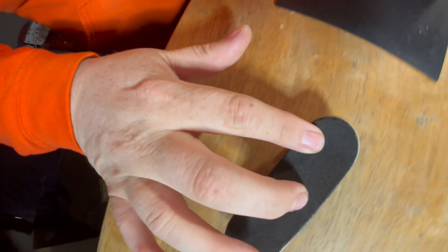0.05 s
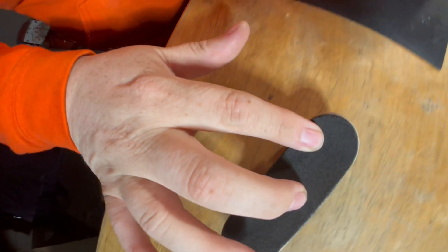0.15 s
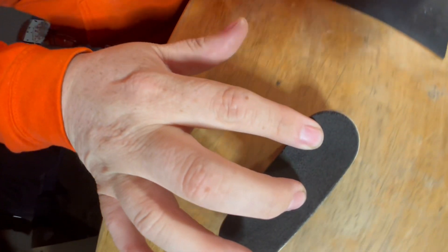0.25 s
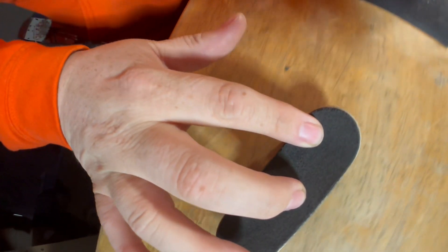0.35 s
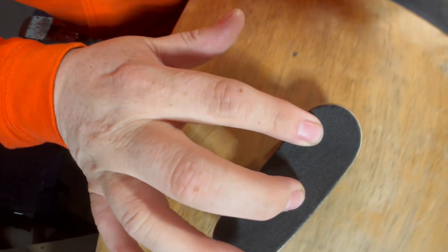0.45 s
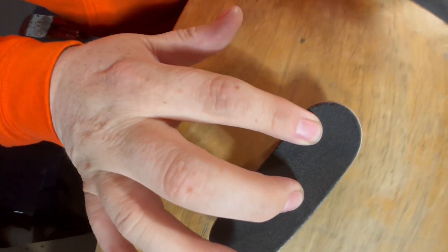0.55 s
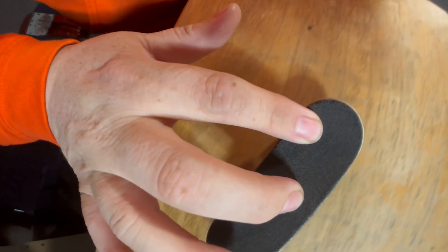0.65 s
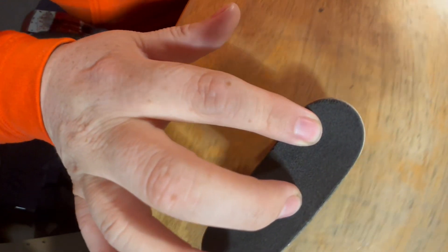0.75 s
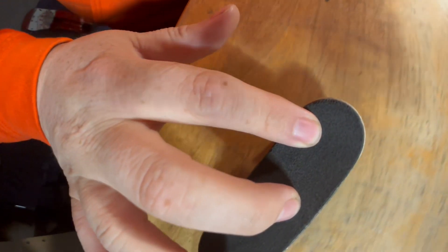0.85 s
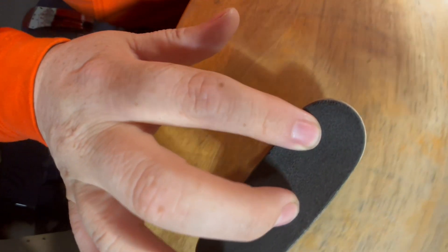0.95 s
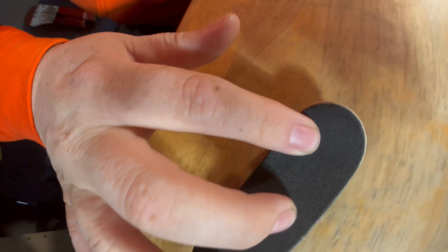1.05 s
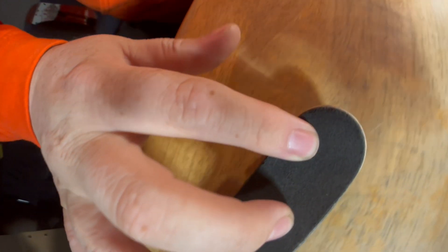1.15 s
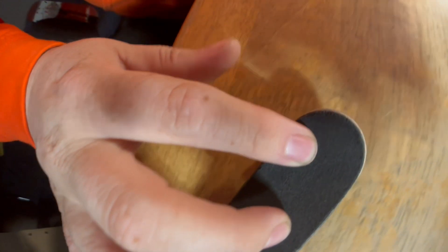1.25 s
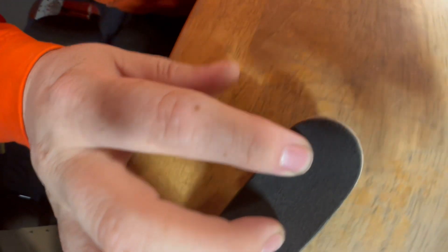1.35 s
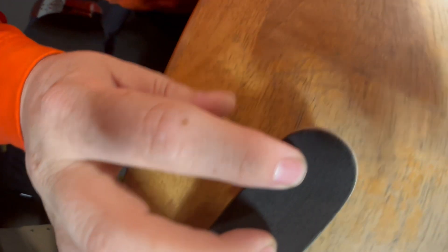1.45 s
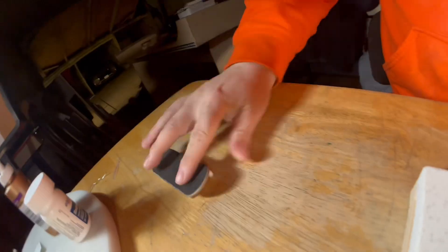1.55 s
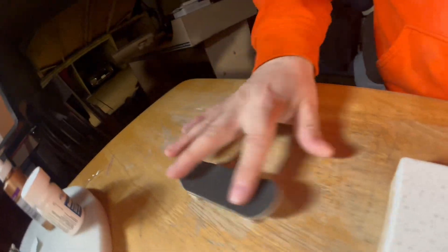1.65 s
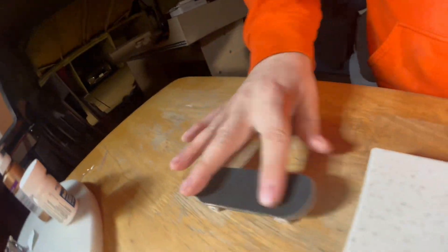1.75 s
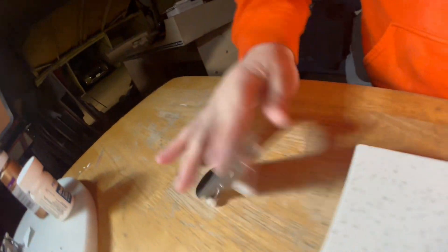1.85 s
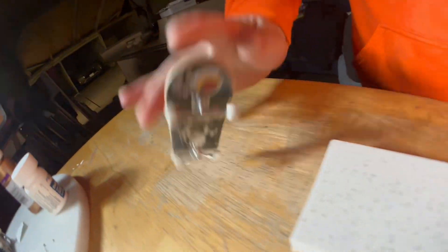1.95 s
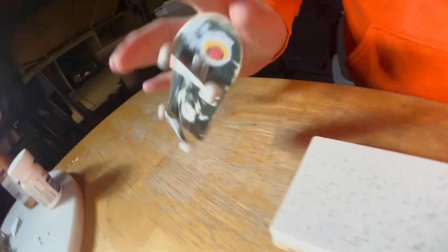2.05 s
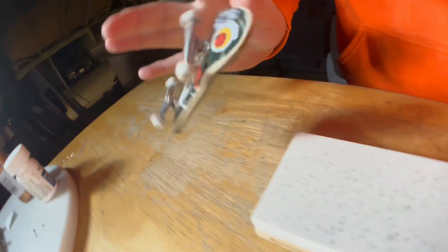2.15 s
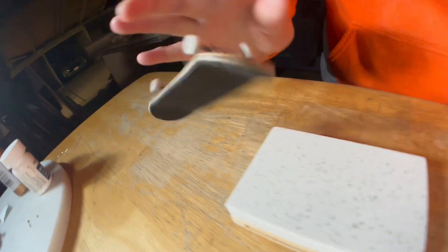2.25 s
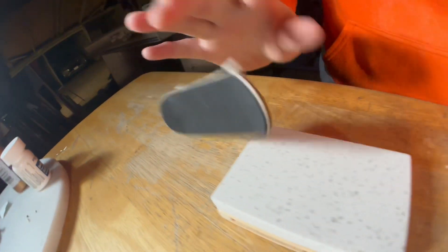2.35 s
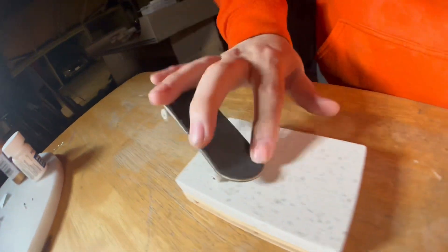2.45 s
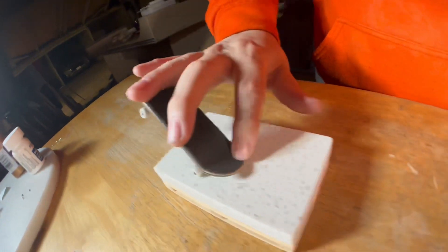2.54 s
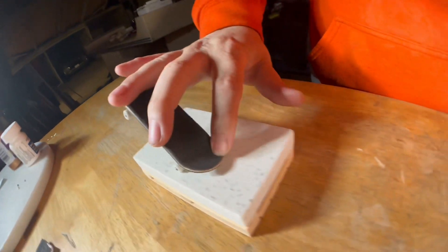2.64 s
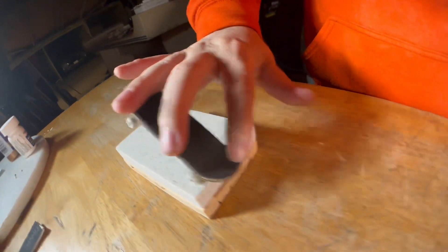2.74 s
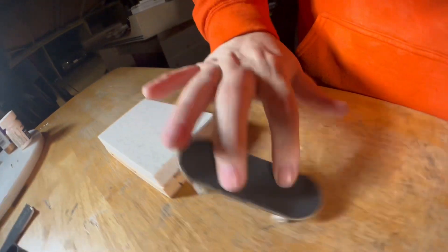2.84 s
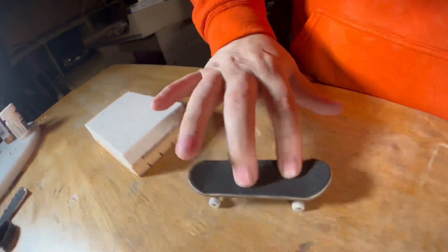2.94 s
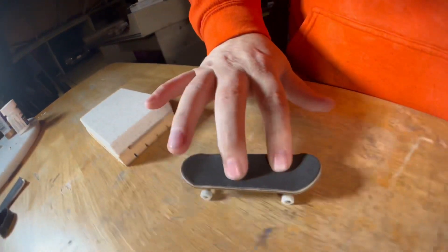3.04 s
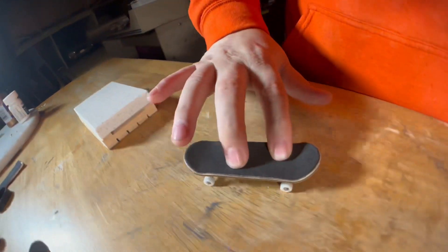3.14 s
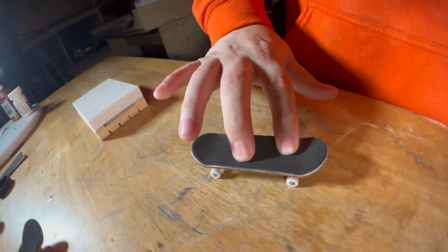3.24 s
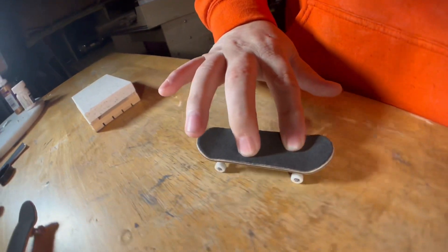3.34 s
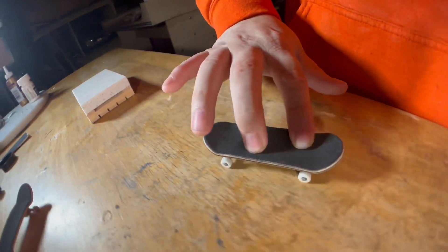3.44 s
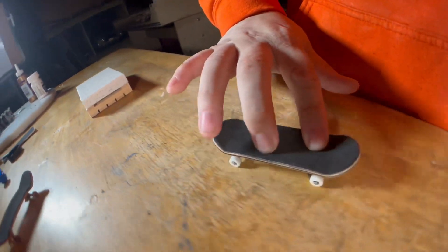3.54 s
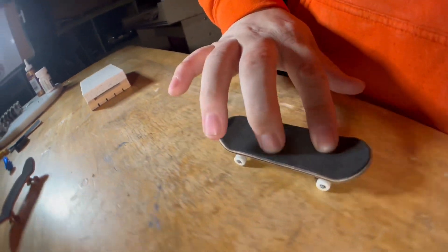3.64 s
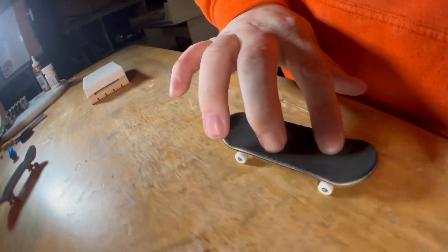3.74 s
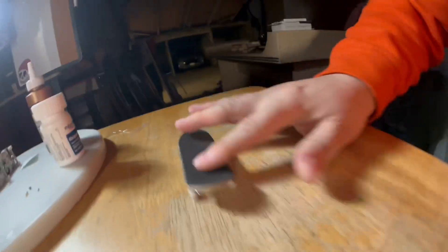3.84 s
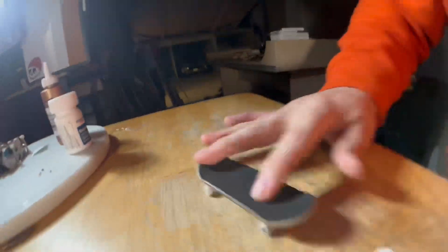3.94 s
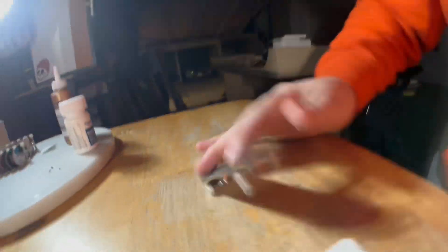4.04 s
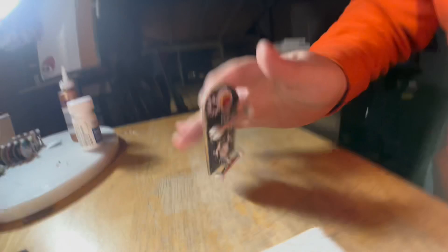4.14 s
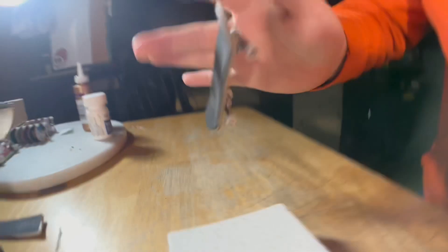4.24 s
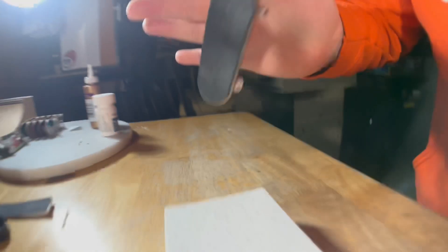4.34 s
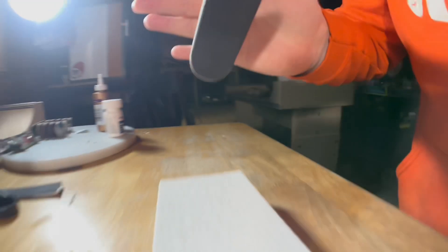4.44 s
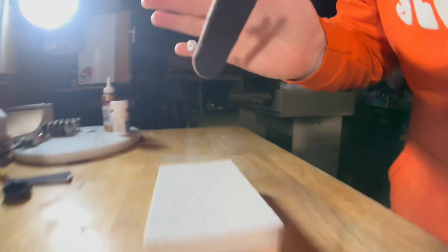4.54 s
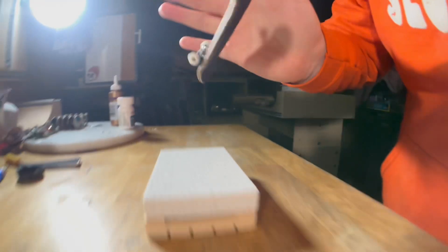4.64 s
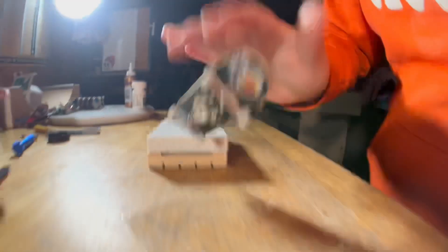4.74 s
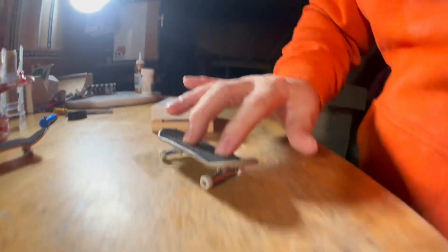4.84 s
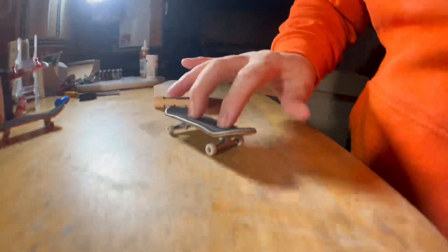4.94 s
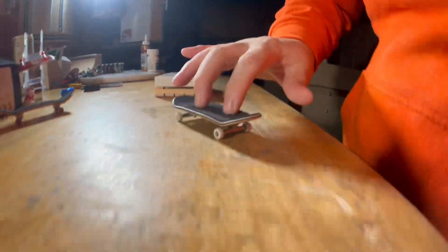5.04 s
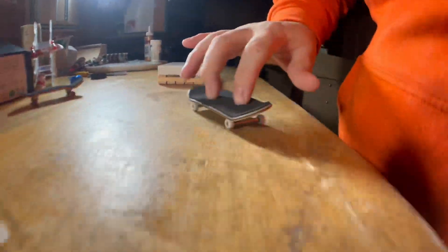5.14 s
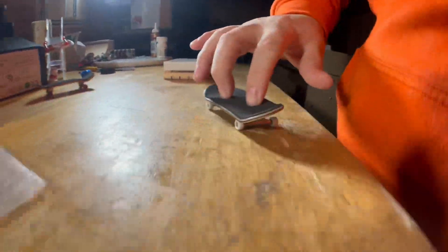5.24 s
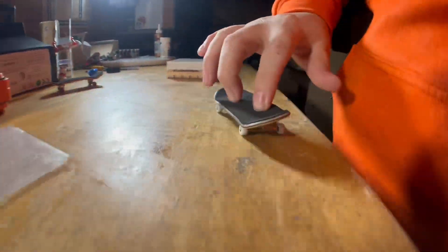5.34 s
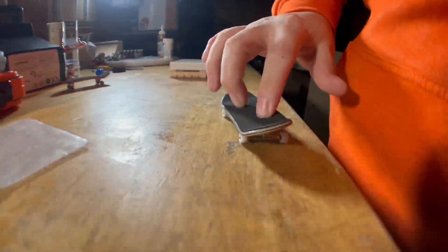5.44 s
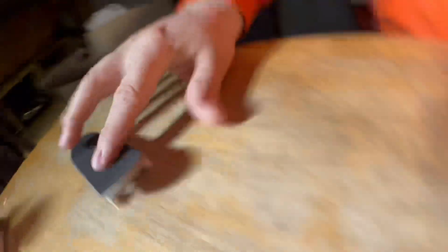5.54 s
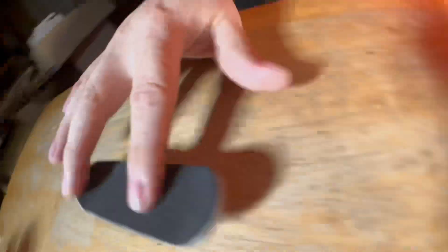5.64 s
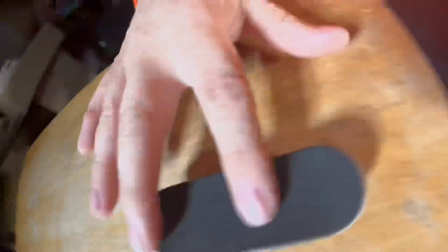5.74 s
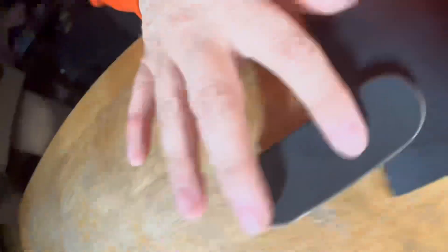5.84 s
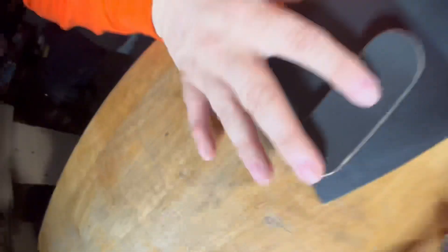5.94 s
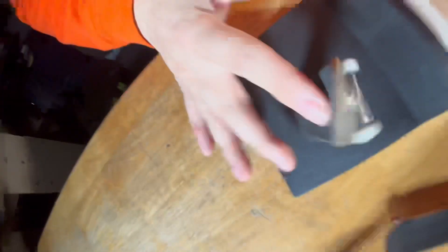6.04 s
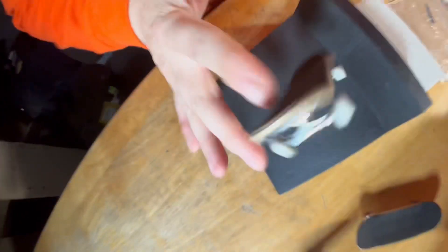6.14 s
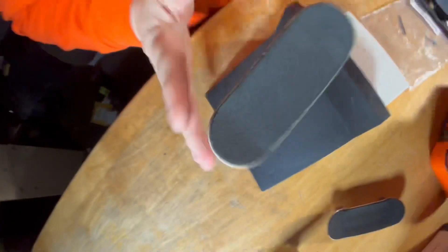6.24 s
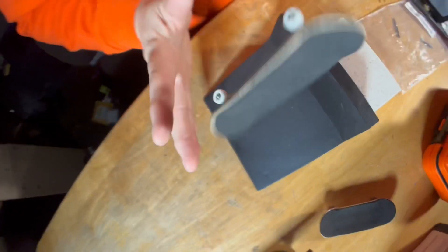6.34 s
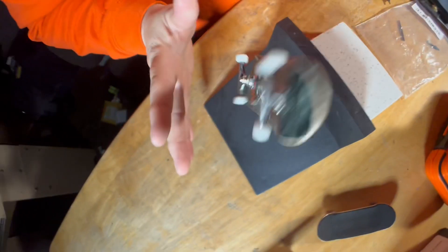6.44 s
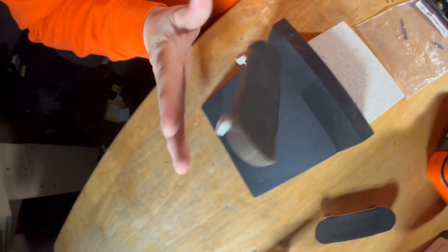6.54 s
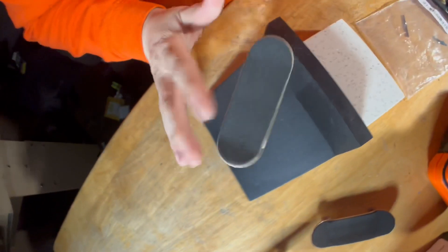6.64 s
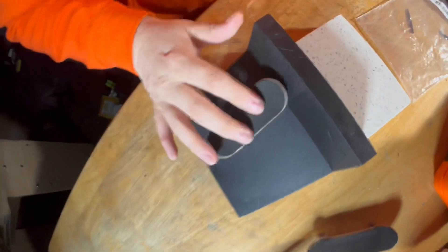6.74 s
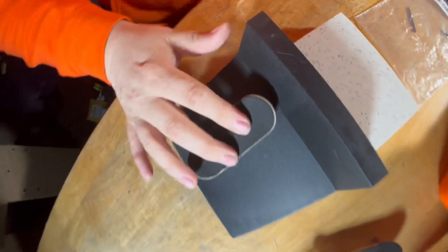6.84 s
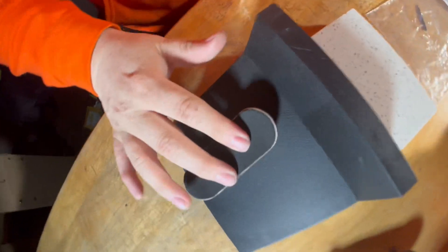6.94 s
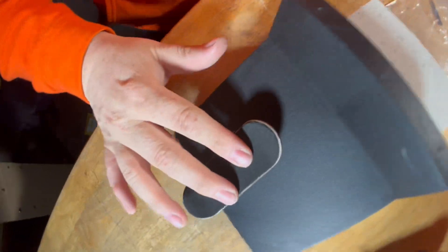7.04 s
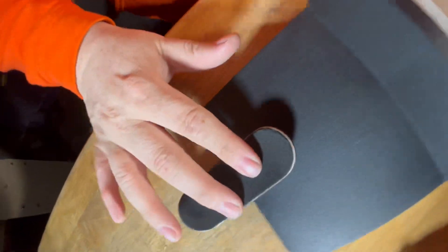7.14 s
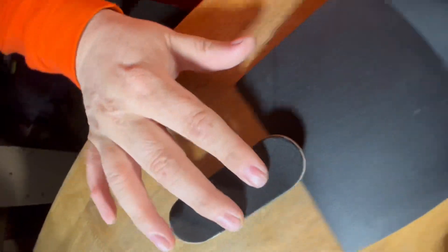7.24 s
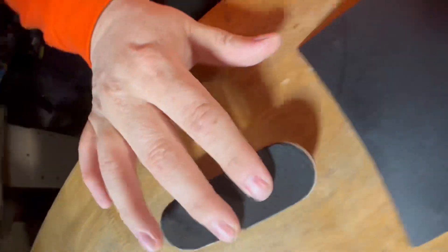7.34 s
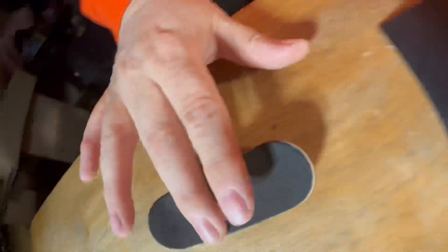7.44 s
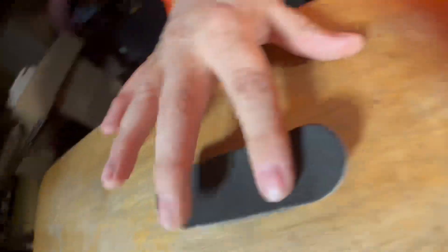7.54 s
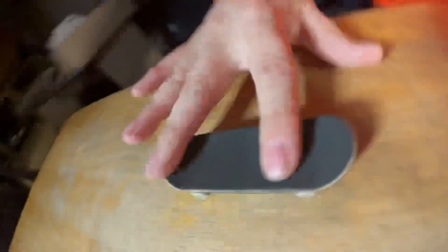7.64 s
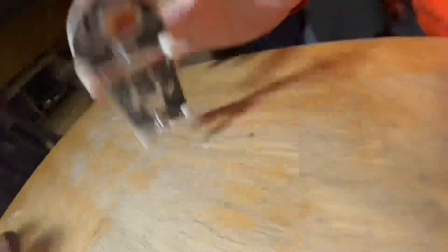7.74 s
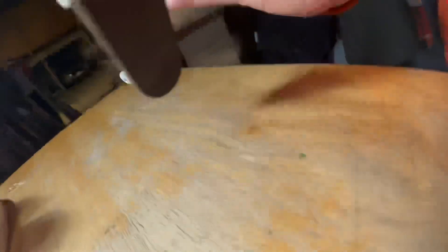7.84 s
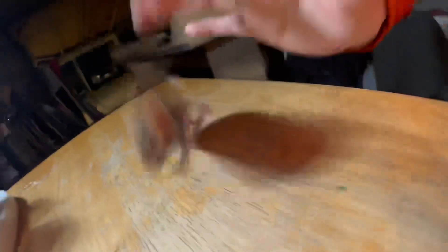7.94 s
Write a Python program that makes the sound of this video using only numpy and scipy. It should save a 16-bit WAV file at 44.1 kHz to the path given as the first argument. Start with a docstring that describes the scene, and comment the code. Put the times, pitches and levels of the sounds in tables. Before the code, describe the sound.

A finger-sized skateboard rolls, pops and clacks down on a wooden table, some tricks slowed and lowered, then rattles over a hollow ramp.

```python
"""In a small room, a finger-sized skateboard rolls, scrapes, pops and lands on a wooden table, a stone block
and a hollow ramp. Rough noise shakes the wood, wheels and grit; short blows ring them, the table top and the ramp.
Pressed wheels growl, and a slow axle sings. Echoes, faint hiss and a low rumble surround the board.
A close phone with two microphone ports hears it; the run-up and the flips play in slow motion,
which stretches the sound and lowers its pitch."""
import sys
import numpy as np
from scipy import signal
from scipy.fft import rfft, irfft, next_fast_len
from scipy.io import wavfile
from scipy.ndimage import map_coordinates

SR = 44100
rng = np.random.default_rng(int(sys.argv[2]) if len(sys.argv) > 2 else 0)


def output_pcm(signal):
    """Save a mono or channel-first signal as 16-bit PCM at the path in sys.argv[1].

    Samples are clipped to [-1, 1] before scaling.
    """
    pcm = np.clip(np.atleast_2d(signal).T, -1, 1) * 32767
    wavfile.write(sys.argv[1], SR, np.round(pcm).astype(np.int16))


N = 351918
STEP = 16  # samples between control values
TOUCH_S = 0.015  # time the wheels take to meet or leave the surface

# In every table t/s is the time as played; f/Hz is the pitch at real speed, before any slow motion.
# Levels are those of the sources, before the room's echoes and the overall tone colour.

# Slow-motion stretches: start t/s, end t/s, share of real speed
SLOW_MOTION = [(0, 1.5, .357), (1.768, 2.389, .4), (3.997, 4.721, .4), (5.985, 6.711, .4)]


def slow_motion_clock():
    """Adds up the real time that passes while the slowed sound plays, and finds the way back."""
    shown = np.arange(N) / SR
    speed = np.ones(N)
    for start, end, share in SLOW_MOTION:
        speed -= (1 - share) * (shown >= start) * (shown < end)
    lived = np.cumsum(speed) / SR
    return shown, lived, np.interp(shown, lived, shown)


# played time; real time gone by at each played sample; played time of each real-time sample
SHOWN, LIVED, WHEN = slow_motion_clock()


def real_sample(t):
    """The real-time sample that belongs to a played time in seconds."""
    return round(np.interp(t, SHOWN, LIVED) * SR)


# Wheels pushed along, each stroke swelling or fading towards its turning point, then letting go
# (a negative rise is a fall): start t/s, turning point t/s, end t/s,
# rumble level/dB at the turn, its rise/dB, wheel hiss level/dB at the turn, its rise/dB,
# grit over hiss level/dB, rumble f/Hz at start, rumble f/Hz at the turn
PUSH_STROKES = [(0, 1.49, 1.62, -48, -2, -48, 6.5, -21, 984, 1040),
                (1.513, 1.561, 1.66, -41.5, 2.5, -53, -11.5, -2, 380.2, 479.9),
                (1.583, 1.696, 1.769, -27.5, 13, -32, 17, -10.5, 329, 1206),
                (1.784, 1.824, 2.04, -45, 11.5, -59, 0.5, 6, 1103, 1160),
                (2.667, 2.759, 2.768, -43, 28, -36, 24, -11, 905, 1904),
                (2.876, 3.098, 3.59, -43.5, 2, -54.5, 2.5, -13, 1101, 1002),
                (3.197, 3.811, 3.83, -49, 0.5, -49, 7, -21, 1246, 1750),
                (3.846, 3.939, 3.939, -19, 6.5, -18, 14, -3.5, 649.7, 1609),
                (3.95, 3.961, 3.968, -26.5, 1.5, -28, 3, -7, 1296, 1194),
                (4.004, 4.019, 4.206, -36, 1, -39, 5.5, -12, 1333, 1518),
                (4.927, 5.439, 5.475, -44, 5, -54, 12, 3, 758, 1868),
                (5.488, 5.551, 5.59, -33.5, 3.5, -45.5, 15, -5.5, 518.7, 589.8),
                (5.559, 5.794, 5.95, -29, 5, -29.5, 14, -13.5, 650, 949.9),
                (5.853, 5.884, 5.9, -21.5, -2, -32, -6, -6, 1151, 1351),
                (5.894, 5.938, 5.957, -23, -5, -38.5, -7.5, -6, 651.1, 1300),
                (5.977, 5.976, 5.99, -19.5, 6.5, -26, 14.5, -6, 1289, 1482),
                (5.987, 5.987, 6.05, -29, 3, -33, -4, -0.5, 876, 906.4),
                (6.72, 6.748, 6.768, -25, 0, -28.5, 4, -1.5, 698, 990),
                (6.896, 7.068, 7.08, -31, 13, -46.5, 14.5, -4, 555, 500),
                (7.099, 7.177, 7.215, -28, 0.5, -40.5, 14.5, -5.5, 481.8, 1674),
                (7.201, 7.223, 7.27, -27, 1.5, -38, 4, -9, 1044, 561.2),
                (7.3, 7.381, 7.46, -37, 10.5, -44, 17, -13, 845.5, 1023),
                (7.414, 7.491, 7.54, -37.5, 9.5, -44, 9.5, -11, 787, 855),
                (7.552, 7.58, 7.77, -50.5, -2, -65, -1.5, -2, 787, 848),
                (7.619, 7.674, 7.72, -26.5, 19, -29.5, 22.5, -10, 860.5, 1097)]
RUMBLE_FALL_DB, HISS_FALL_DB = 18.5, 26.5  # from turning point to end


def push_strokes(when):
    """Each push moves the levels of rumble, hiss and grit, and the pitch of the rumble."""
    levels, pitch = np.zeros((3, len(when))), np.zeros(len(when))
    for start, turn, end, rumble_db, rise_db, hiss_db, hiss_rise_db, grit_db, start_hz, turn_hz in PUSH_STROKES:
        start, turn, end = np.sort([start, turn, end])
        touch = touching(when, start, end)
        before = np.interp(when, [start, turn, end], [1, 0, 0])
        after = np.interp(when, [start, turn, end], [0, 0, 1])
        rumble = touch * amp(rumble_db - rise_db * before - RUMBLE_FALL_DB * after)
        hiss = touch * amp(hiss_db - hiss_rise_db * before - HISS_FALL_DB * after)
        levels += [rumble, hiss, amp(grit_db) * hiss]
        pitch += rumble * (turn_hz + (start_hz - turn_hz) * before)
    # where strokes overlap, the louder one counts more in the pitch
    return levels, (pitch + 1e-9) / (levels[0] + 1e-12)


# Resonances of deck and table: f/Hz, width f/Hz, level/dB
WOOD_MODES = [(383, 299, 1.5), (575, 240, 0), (835, 141, -1), (1024.5, 156, 0), (1216, 150, -0.5),
              (1608, 180, -1.5), (2019, 190, -2.5), (2483, 448, -2.5)]
# Resonances of wheels and axles: f/Hz, width f/Hz, level/dB
WHEEL_MODES = [(3150, 840, -1.5), (4044, 1170, 0.5), (4775, 814, -2)]
# Resonances of hard small contacts: f/Hz, width f/Hz, level/dB
GRIT_MODES = [(5640, 3230, -7), (8210, 1400, -1.5), (13160, 4800, -13)]
# The singing of a slow axle: f/Hz, width f/Hz, level/dB
AXLE_MODES = [(3767, 32, 0)]
# How loud the axle sings: t/s, level/dB
AXLE_LEVELS = [(0, -53), (.42, -56), (.62, -57.5), (1.45, -56), (1.5, -100)]
CRUSH_DB = -36.5  # the further wheel hiss rises above this, the rarer the specks of grit


def rolling():
    """The surface shakes wood, wheels and grit; finger pressure moves which wood resonance speaks."""
    levels, pitch = push_strokes(WHEN[::STEP])

    # wood resonances far from the current pitch speak more softly, by at most 5.5 dB
    shares = np.array([amp(np.maximum(-16 * np.log2(hz / pitch) ** 2, -5.5)) for hz, w, db in WOOD_MODES])
    shares /= np.linalg.norm(shares, axis=0)
    rub = roughness(lumpy_db=2.0, lump_rate=70, tick_rate=130, tick_db=14.5, spread_db=-1)
    voices = []
    for hz, width, db in WOOD_MODES:
        response = ringing([(hz, width, 0)])
        voice = unit(filtered(rub, lambda f: response(f) ** 2))
        voices.append(amp(db + 1.7 * wobble(32)) * voice)
    wood = np.sum(every_sample(shares) * voices, axis=0)

    crush = np.minimum(amp(CRUSH_DB) / (levels[1] + 1e-9), 1)
    speck_rate = 200 * every_sample([crush])[0]
    scrape = roughness(lumpy_db=2.5, lump_rate=140, tick_rate=speck_rate, tick_db=12, spread_db=2.5)
    wheels = amp(1.4 * wobble(25)) * unit(filtered(scrape, lambda f: ringing(WHEEL_MODES)(f) ** 1.5))
    grit = unit(filtered(scrape, ringing(GRIT_MODES)))

    axle_level = amp(np.interp(WHEN, *np.transpose(AXLE_LEVELS)))
    axle = axle_level * unit(filtered(rub, ringing(AXLE_MODES)))
    return np.sum(every_sample(levels) * [wood, wheels, grit], axis=0) + axle


# Strikes of the board: t/s, level/dB, kind of contact
STRIKES = [(.722, -31.5, "bump"), (.755, -32.5, "bump"), (0.986, -33, "bump"), (1.041, -41, "bump"),
           (1.15, -40, "bump"), (1.294, -27.5, "bump"), (1.337, -24.5, "bump"), (1.502, -18.5, "deck"),
           (1.8333, -9.5, "tail"), (2.4041, -5, "wheels"), (2.409, -4.5, "wheels"), (2.4157, -9, "wheels"),
           (2.4261, -18.5, "glancing"), (2.456, -7.5, "wheels"), (2.468, -25, "wheels"),
           (2.4338, -22.5, "glancing"), (2.68, -39, "wheels"), (2.726, -30, "speck"),
           (2.8208, -4, "wheels"), (2.8272, -1.5, "wheels"), (2.84, -10.5, "glancing"),
           (2.8554, -7, "glancing"), (2.866, -5.5, "glancing"), (3.1036, -30, "speck"),
           (3.1135, -28, "speck"), (3.128, -31, "speck"), (3.1565, -32.5, "speck"), (3.275, -44, "speck"),
           (3.446, -29.5, "speck"), (3.487, -33, "speck"), (3.5436, -28, "speck"), (3.5535, -27, "speck"),
           (3.665, -36, "speck"), (3.7589, -30.5, "speck"), (3.7803, -24.5, "speck"), (3.835, -19, "deck"),
           (4.0343, -9.5, "tail"), (4.784, -2.5, "wheels"), (4.7877, -4.5, "glancing"),
           (4.7999, -1.5, "wheels"), (4.8069, -1, "glancing"), (4.819, -19, "deck"), (5.1286, -32, "tail"),
           (5.337, -39, "tail"), (5.415, -37.5, "deck"), (5.482, -44.5, "flat"), (5.543, -27, "deck"),
           (5.787, -8, "wheels"), (5.794, -15, "speck"), (5.8138, -13, "speck"), (5.8238, -14, "speck"),
           (5.843, -12, "crunch"), (5.867, -11.5, "crunch"), (5.89, -10.5, "crunch"),
           (5.8472, -2, "wheels"), (5.903, -4.5, "wheels"), (5.981, -10, "deck"), (6.0441, -27.5, "deck"),
           (6.25, -43, "wheels"), (6.535, -49, "wheels"), (6.708, -8, "deck"), (6.7119, -7.5, "crunch"),
           (6.7157, -11, "crunch"), (6.726, -16, "crunch"), (6.733, -13.5, "deck"), (6.7382, -8, "crunch"),
           (6.7429, -8.5, "crunch"), (6.7455, -8.5, "crunch"), (6.752, -14.5, "crunch"),
           (6.934, -32, "wheels"), (6.981, -25, "wheels"), (7.045, -25, "speck"), (7.075, -12, "wheels"),
           (7.0824, -9.5, "wheels"), (7.232, -5, "wheels"), (7.399, -26.5, "wheels"),
           (7.242, -24.5, "speck"), (7.557, -43, "speck"), (7.574, -42, "speck"), (7.627, -32, "speck"),
           (7.645, -26, "speck"), (7.724, -9.5, "tail"), (7.76, -33.5, "speck"), (7.772, -46, "speck"),
           (7.9349, -8, "flat"), (7.938, -14.5, "crunch")]
# Each kind of contact: wood knock level/dB, bright click level/dB (both on top of the strike's level),
# chatter decay/ms, f/Hz above which the contact is too soft to excite much
CONTACT_KINDS = {"tail": (-6.5, 2, 1.14, 19001), "wheels": (-18.5, -5.5, 1.1, 19000),
                 "glancing": (-10.5, -26.5, 2, 15000), "deck": (1.5, -6, 1.95, 14997),
                 "flat": (6, -7, 0.5, 9000), "bump": (-18.5, -47, 1, 4497),
                 "speck": (-22.5, -26, 1.8, 4700), "crunch": (-5, -9, 3.5, 14998)}


def clacks():
    """Each strike is a sharp blow inside a few ms of chatter; it rings wheels, grit and wood."""
    out, t = np.zeros(N + SR), np.arange(SR // 8) / SR
    blow = np.exp(-((t - .0013) / .00003) ** 2)

    def burst(ms):
        """The blow and its chatter, which swells in about 1 ms and dies away."""
        fade = np.exp(-t / ms * 1000) * (1 - np.exp(-t / 0.00099))
        return blow + 0.66 * rng.standard_normal(len(t)) * fade

    for s, db, contact in STRIKES:
        knock_db, click_db, ms, hard_hz = CONTACT_KINDS[contact]
        wheels = peak(filtered(burst(ms), vary(WHEEL_MODES, 1.48)))
        click = peak(filtered(burst(ms), vary(GRIT_MODES, 0.71)))
        knock = peak(filtered(burst(ms), vary(WOOD_MODES, 1.08)))
        hit = amp(db - 3) * wheels + amp(db + click_db) * click + amp(db + knock_db) * knock
        hit = filtered(hit, lambda hz: 1 / (1 + 1j * hz / hard_hz - (hz / hard_hz) ** 2) ** 2)
        out[real_sample(s):][:len(t)] += hit
    return out[:N]


# The board rattles on the hollow ramp: t/s, level/dB of the shaking force, rattle decay/ms
RAMP_RATTLES = [(5.843, -1, 12), (5.866, -6.5, 12), (5.888, -4, 15), (5.908, -9.5, 13), (5.928, -5, 12),
                (5.983, 3, 6.4), (6.018, 0, 5.1), (6.052, -8.5, 6.7), (6.709, 3, 8.8), (6.724, 0, 13),
                (6.739, 0.5, 9), (6.749, -2.5, 5.3)]
# Resonances of the hollow ramp: f/Hz, width f/Hz, level/dB
RAMP_MODES = [(536, 59, -1), (650, 51, -8), (836, 28, -2.5), (935, 17, 1), (1023, 42, 2), (1510, 36, -8.5),
              (1750, 120, -9.5), (2006, 40, -9)]
FIRST_BLOW_DB = 18.5  # the blow that opens each rattle, over it


def ramp():
    """A blow, then a dying, lumpy rattle: both drive the resonances of the hollow ramp."""
    force, blows, t = np.zeros(N + SR), np.zeros(N), np.arange(SR // 4) / SR
    for s, db, ms in RAMP_RATTLES:
        at = real_sample(s)
        force[at:][:len(t)] += amp(db) * np.exp(-t / ms * 1000)
        blows[at] = amp(db + FIRST_BLOW_DB)
    rattle = force[:N] * amp(3.33 * wobble(250)) * rng.standard_normal(N)
    return filtered(blows + rattle, ringing(RAMP_MODES))


# Pressed wheels growl: start t/s, end t/s, level/dB, f/Hz at start, f/Hz at end
WHEEL_GROWLS = [(5.482, 5.595, -34, 611, 603), (5.601, 5.83, -34, 780, 957),
                (5.905, 5.945, -30.5, 1357, 1470), (6.923, 7.14, -38.5, 519.4, 511.6),
                (7.109, 7.187, -34, 1000, 1644), (7.105, 7.201, -39, 1924, 1840),
                (7.202, 7.255, -33, 579.7, 538), (7.443, 7.557, -41.5, 823, 848)]
GROWL_WIDTH_HZ = 77


def growls():
    """A narrow band of noise whose centre glides while the wheels are pressed down."""
    out = np.zeros(N)
    for start, end, db, start_hz, end_hz in WHEEL_GROWLS:
        band = unit(filtered(rng.standard_normal(N), lambda hz: 1 / (1 + (hz / GROWL_WIDTH_HZ) ** 2)))
        turns = np.cumsum(np.interp(WHEN, [start, end], [start_hz, end_hz])) / SR
        out += amp(db) * touching(WHEN, start, end) * band * np.cos(2 * np.pi * turns)
    return out


# Tail or hand thumps the table top: t/s, peak level/dB, push length/ms
TABLE_THUMPS = [(1.505, -29, 0.73), (1.84, -23, .6), (1.85, -31, 2), (2.421, -31.5, 2), (2.432, -25, 1.4),
                (2.446, -32, 2), (2.84, -25, 2.2), (2.868, -30.5, 2), (4.04, -24.5, .6), (4.049, -40, 2),
                (4.793, -34, 1.9), (4.812, -31, 2), (4.822, -26, 2), (5.993, -39, 1.6), (6.751, -35.5, 2),
                (7.247, -40, 2), (7.726, -28, 0.18), (7.947, -31, 1.1)]
# Resonances of the whole table top: f/Hz, width f/Hz, level/dB
TABLE_MODES = [(102, 83, -4.5), (226, 130, -4.5), (274, 33, -8.5), (455.7, 80, -7.5)]


def thumps():
    """A soft, short push rings the whole table top."""
    out, t = np.zeros(N + SR), np.arange(SR // 8) / SR
    lead = .012  # seconds of room for the push to swell
    for s, db, ms in TABLE_THUMPS:
        push = np.exp(-((t - lead) / ms * 1000) ** 2)
        hit = filtered(push, vary(TABLE_MODES, 1.3))
        at = round((np.interp(s, SHOWN, LIVED) - lead) * SR)
        out[at:][:len(t)] += amp(db) * peak(hit)
    return out[:N]


# Table-top scatter that differs between the ports: f/Hz, level/dB
SCATTER_LEVELS = [(100, -18), (500, -11), (1500, -8), (4000, -11), (8000, -18)]


def scatter(x):
    """Quick echoes (20 ms) off table and hand, opposite at the two ports."""
    t = np.arange(SR // 50) / SR
    echoes = rng.standard_normal(len(t)) * amp(-60 * t / 0.072)
    echoed = signal.fftconvolve(x, echoes / np.linalg.norm(echoes))[:N]
    side = filtered(echoed, lambda hz: amp(along(SCATTER_LEVELS, hz)))
    return np.array([side, -side])


# How long the room rings: f/Hz, time to fall by 60 dB as t/s (at real speed)
ROOM_DECAY = [(150, 0.28), (1000, 0.23), (4000, 0.23), (12000, 0.27)]


def room(x, chunk=SR // 3):
    """Each frequency of the tail dies at its own speed; every third of a second meets a new tail."""
    out = np.zeros((2, N + SR))
    for at in range(0, N, chunk):
        hz, t, z = signal.stft(rng.standard_normal((2, SR // 2)), SR, nperseg=256)
        fade = amp(-60 * t / along(ROOM_DECAY, hz)[:, None])
        tail = signal.istft(z * fade, SR, nperseg=256)[1]
        wet = signal.fftconvolve(x[None, at:at + chunk], tail / np.linalg.norm(tail[0]), axes=1)
        late = at + 130  # the echoes start 3 ms after the sound
        out[:, late:late + wet.shape[1]] += wet
    return out[:, :N]


# Likeness of the sound at the two ports: f/Hz, likeness (1 is the same)
PORT_LIKENESS = [(100, 0.28), (1000, 0.15), (4000, 0.43), (8000, 0.98)]


def pair(x):
    """Two unrelated signals mixed into left and right with a likeness set by frequency."""
    turn = lambda hz: np.arccos(np.clip(along(PORT_LIKENESS, hz), -1, 1)) / 2
    mid, side = filtered(x, lambda hz: np.array([np.cos(turn(hz)), np.sin(turn(hz))]))
    return np.array([mid + side, mid - side])


# Colour of the room hiss: f/Hz, relative level/dB per Hz
HISS_COLOUR = [(120, -42.5), (200, -7), (544, -8.5), (610, -13), (2970, -19.5), (3600, -18.5), (7700, -23),
               (9500, -32), (12400, -48), (20900, -120)]
# Colour of the building and handling rumble: f/Hz, relative level/dB per Hz
RUMBLE_COLOUR = [(18, -48.5), (30, -20), (75, -2.5), (178, -14.5), (206, -25.5), (250, -10), (320, -42),
                 (550, -120)]
# Level of that rumble, around which it swells: t/s, level/dB
RUMBLE_LEVELS = [(0.0, -54), (1.78, -54), (3.82, -54), (4.04, -47.5), (4.51, -56), (5.18, -50),
                 (5.49, -58.5), (7.98, -58.5)]


def background():
    """Faint room hiss, and a low rumble nearly the same at both ports."""
    hiss = filtered(rng.standard_normal((2, N)), lambda hz: amp(along(HISS_COLOUR, hz)))
    shared_and_own = rng.standard_normal(N) + 0.4 * rng.standard_normal((2, N))
    low = filtered(shared_and_own, lambda hz: amp(along(RUMBLE_COLOUR, hz)))
    low_db = np.interp(WHEN, *np.transpose(RUMBLE_LEVELS)) + 3 * wobble(6)
    return amp(-62.5) * unit(pair(hiss)) + amp(low_db) * unit(low)


def amp(db):
    """dB to gain."""
    return 10 ** (np.asarray(db) / 20)


def unit(x):
    """Scaled to rms 1."""
    return x / np.sqrt(np.mean(x ** 2) + 1e-20)


def peak(x):
    """Scaled to peak 1."""
    return x / np.max(np.abs(x))


def along(points, hz):
    """Reads a curve of (Hz, value) points on a log frequency axis."""
    f, v = np.transpose(points)
    return np.interp(np.log(hz + 1), np.log(f + 1), v)


def every_sample(rows):
    """Control values, one every STEP samples, drawn out to every sample."""
    return np.array([np.interp(np.arange(N), np.arange(len(r)) * STEP, r) for r in rows])


def touching(when, start, end):
    """1 while the wheels touch the surface, with a short ramp outside each end."""
    return np.clip(np.minimum(when - start, end - when) / TOUCH_S + 1, 0, 1)


def wobble(rate):
    """A smooth random curve, with rate random points a second."""
    return map_coordinates(rng.standard_normal(int(N * rate / SR) + 4), [np.arange(N) * rate / SR])


def filtered(x, response):
    """Sends x through a filter given as a (complex) response of frequency."""
    m = next_fast_len(x.shape[-1] + 8192)
    return irfft(rfft(x, m) * response(np.fft.rfftfreq(m, 1 / SR)), m)[..., :x.shape[-1]]


def ringing(modes):
    """The response of (Hz, width Hz, dB) resonances that ring after a push, with alternating signs."""
    def response(f):
        total = 0
        for k, (c, w, db) in enumerate(modes):
            total = total + (-1) ** k * amp(db) * 1j * f * w / (c * c - f * f + 1j * f * w)
        return total
    return response


def vary(modes, wide):
    """The same resonances, met a little differently by each blow."""
    return ringing([(hz * (1 + 0.022 * rng.normal()), w * wide, g + rng.normal(0, 3.2)) for hz, w, g in modes])


def roughness(lumpy_db, lump_rate, tick_rate, tick_db, spread_db):
    """What a small wheel feels: lumpy noise of the wood grain plus sparse specks of grit."""
    lumps = unit(amp(lumpy_db * wobble(lump_rate)) * rng.standard_normal(N))
    hits = rng.random(N) < tick_rate / SR
    ticks = hits * amp(tick_db + np.minimum(spread_db * rng.exponential(size=N), 14))
    return lumps + ticks * rng.choice([-1, 1], N)


DULL_HZ = 6060  # the walls swallow the treble above this


def scene():
    """The board, the answers of table top and room, and the background."""
    board = rolling() + clacks() + thumps() + ramp() + growls()
    echoes = filtered(room(board), lambda hz: 1 / (1 + 1j * hz / DULL_HZ))
    return board + scatter(board) + amp(-9.5) * pair(echoes) + background()


# Overall tone colour, with a treble lift near 9 kHz, a dip above 10 kHz and none above 20 kHz: f/Hz, level/dB
TONE_COLOUR = [(20, -6.5), (70, 2.5), (7000, 0), (8500, 4.5), (9400, 9), (10400, -4.5), (12500, -4.5),
               (15300, 3.5), (17000, 6.5), (19500, -8.5), (20300, -82.5)]
# Left port minus right port: f/Hz, level/dB
PORT_TILT = [(200, -1), (900, -0.5), (2400, 3), (4400, 3), (8000, 0)]
# How far the left port leads: f/Hz, phase/radians
PORT_LEAD = [(0, 0), (1700, -.4), (3200, .6), (4800, .1), (5500, -.8), (6900, 0), (20700, -15.2)]
TOP_HZ = 16800  # nothing is left from here up


def record(dry):
    """Tone colour, two ports (tilt, treble late on the left), soft overload, slow-motion playback, band limit."""
    def half(hz):
        """Half the difference between the ports; the right one gets its inverse."""
        return amp(along(PORT_TILT, hz) / 2) * np.exp(.5j * np.interp(hz, *np.transpose(PORT_LEAD)))

    x = filtered(dry, lambda hz: amp(along(TONE_COLOUR, hz)) * [half(hz), 1 / half(hz)])
    x = x / (1 + np.abs(x / .98) ** 4) ** (1 / 4)
    fine = signal.resample_poly(x, 2, 1, axis=1)  # twice the samples, for cleaner reading in between
    played = np.array([map_coordinates(c, [LIVED * SR * 2]) for c in fine])
    return filtered(played, lambda hz: amp(-18 * np.clip((hz - 15700) / 500, 0, 1)) * (hz < TOP_HZ))


dry = scene()
out = record(dry)
output_pcm(out)
```